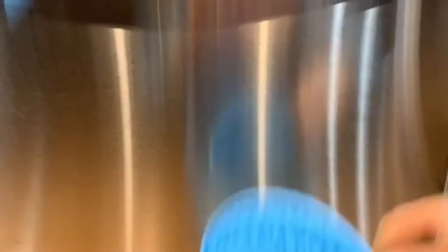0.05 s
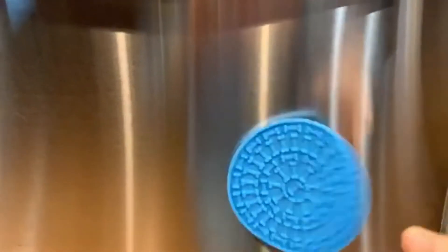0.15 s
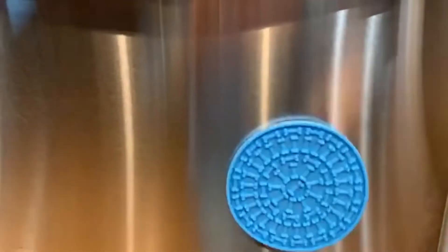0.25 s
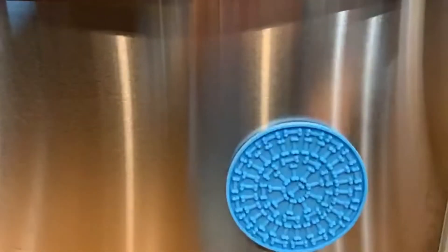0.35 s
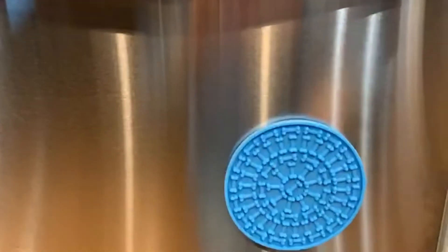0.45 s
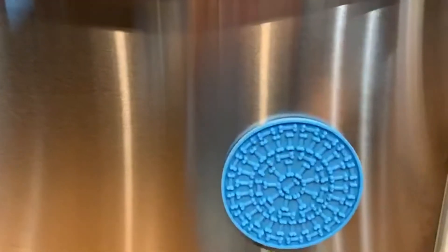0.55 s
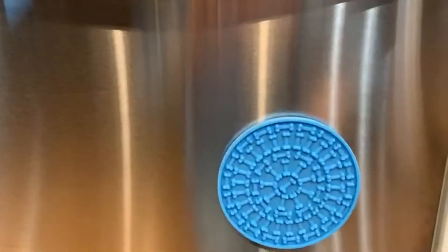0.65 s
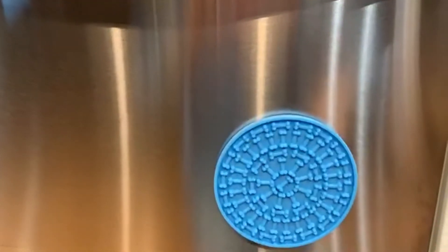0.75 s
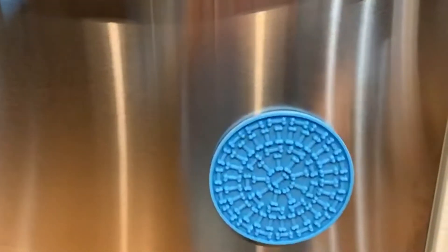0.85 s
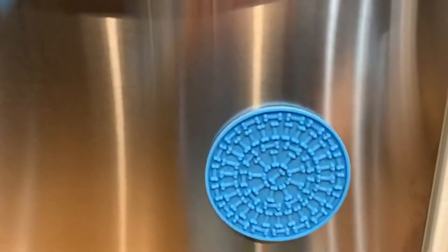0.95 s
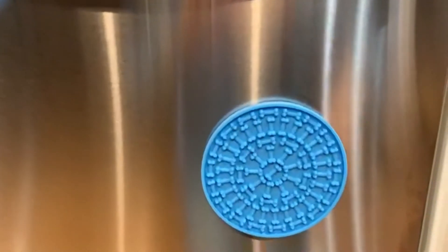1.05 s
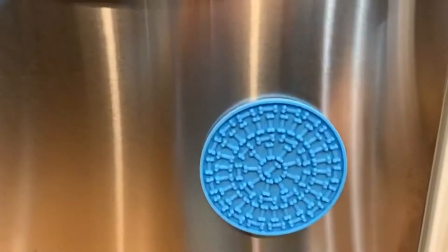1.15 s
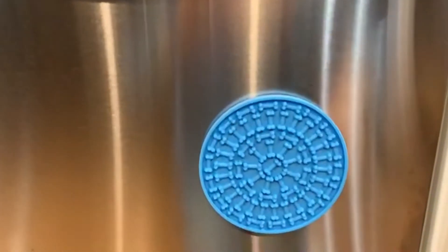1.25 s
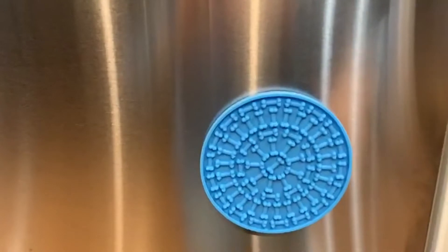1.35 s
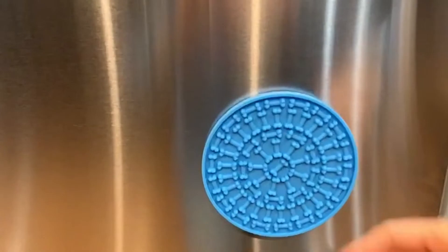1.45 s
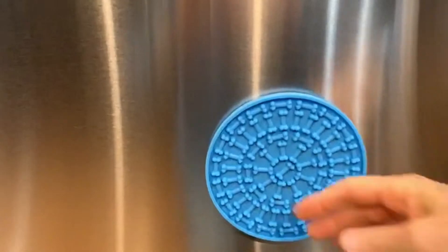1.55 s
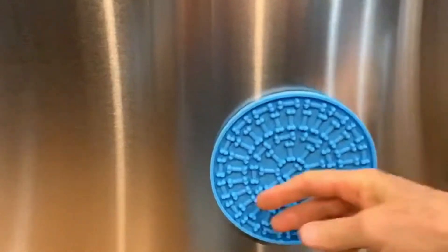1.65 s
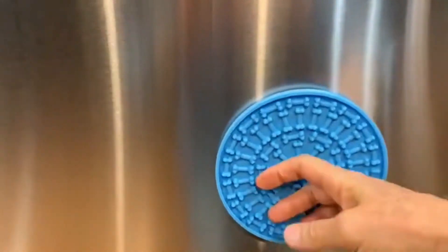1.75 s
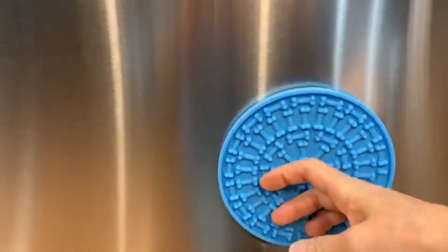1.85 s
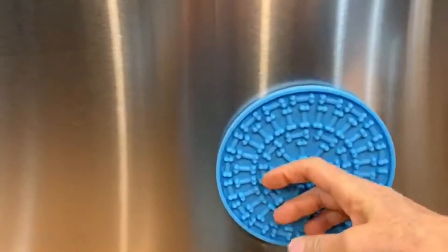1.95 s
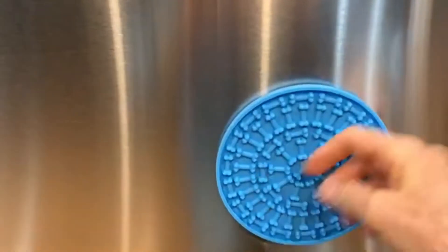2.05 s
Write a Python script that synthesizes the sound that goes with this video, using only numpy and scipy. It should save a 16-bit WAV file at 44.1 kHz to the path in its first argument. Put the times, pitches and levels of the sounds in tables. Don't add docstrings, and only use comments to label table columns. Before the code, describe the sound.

A silicone suction mat smacks a steel appliance door in a quick double slap with popping cups and a low metal thud; after a quiet gap, fingers press it with a softer cluster of pops. Close stereo phone, quiet kitchen.

```python
import sys
import numpy as np
from scipy import signal
from scipy.fft import rfft, irfft
from scipy.io import wavfile
from scipy.ndimage import uniform_filter1d

SR = 44100
rng = np.random.default_rng(int(sys.argv[2]) if len(sys.argv) > 2 else 0)


def transcribe(u):
    v = np.clip(np.atleast_2d(u).T, -1, 1)
    q = np.round(v * 32767).astype(np.int16)
    wavfile.write(sys.argv[1], SR, q)


def to_linear_factor(level_db):
    exponent = np.asarray(level_db, float) / 20
    return 10 ** exponent


N = 92610
T = np.arange(N) / SR
EARS = np.array([[.5], [-.5]])
POP_BEND = 1.346

# frequency in Hz, left over right in dB.
PORT_BALANCE = [(250, 0.5), (1500, 3.5), (3000, 2), (5000, -2.5), (8000, 0.5)]
# frequency in Hz, left ahead of right in radians.
PORT_PHASE = [(200, .1), (1000, 0.39), (2500, 0.53), (5000, 1.5), (8000, 1.3)]
SHUDDER_STARTS = [.122, .186, .2085, .277, .765, 1.80, 1.85, 1.13]
# level in dB, swell in seconds, hold in seconds,
# share of the full decay time. The first five are the bare door, the rest the door under fingers.
SHUDDER_SHAPES = [
    (-53, 0.0027, 0.0068, 0.21),
    (-38, 0.013, 0.011, 0.0432),
    (-24.5, .001, .008, 0.25),
    (-23.5, 0.0054, 0.045, 0.85),
    (-57, .006, 0.028, 0.126),
    (-26, 0.0057, 0.0325, 0.134),
    (-43, 0.011, 0.025, 2.1),
    (-61, 0.019, 0.037, .3),
]


def at(table, hz):
    table = np.array(table)
    return np.interp(np.log(np.maximum(hz, 1)), np.log(table[:, 0]), table[:, 1])


def noise(gain, size=N, near_db=0.):
    # frequency in Hz, side under mid in dB.
    diffuse_side = [(60, -16.5), (300, -8), (1500, 0.5), (8000, -1.5)]
    hz = np.arange(size // 2 + 1) * SR / size
    mid, side = rfft(rng.standard_normal((2, size)))
    ports = mid + 2 * EARS * to_linear_factor(at(diffuse_side, hz) - near_db) * side
    ports = ports * to_linear_factor(EARS * at(PORT_BALANCE, hz))
    if near_db > 0:
        ports = ports * np.exp(1j * EARS * at(PORT_PHASE, hz))
    x = irfft(gain(hz) * ports, size)
    return x / np.sqrt(np.mean(x ** 2))


def treble_gaps(hz):
    # frequency in Hz, half width in Hz, depth in dB.
    gaps = [(9800, 620, -30), (13500, 420, -30), (16200, 1100, -22)]
    return to_linear_factor(sum(db * np.exp(-((hz - f) / w) ** 4) for f, w, db in gaps))


def peaks(table):
    def gain(hz):
        return np.sqrt(sum(to_linear_factor(2 * db) / (1 + (2 * (hz - f) / w) ** 2) ** 2 for f, w, db in table))
    return gain


def shape(t, swell, t60, hold=0., bend=0.98):
    rise = np.sin(np.pi / 2 * np.clip(t / max(swell, 1e-4), 0, 1)) ** 2
    fading = np.maximum(t - swell - hold, 0) / max(t60, .002)
    return rise * to_linear_factor(-60 * fading ** bend)


def walk(rate):
    k = int(SR / rate)
    steps = np.repeat(rng.standard_normal(N // k + 1), k)
    x = uniform_filter1d(uniform_filter1d(steps, k), k)[:N]
    return x / x.std()


def levels_over_time(rows):
    return to_linear_factor(np.interp(T, *np.array(rows).T))


def add_ring(out, s, db, hz, t60, swell, glide=0., bend=0.99):
    i = int(s * SR)
    t = T[i:i + int((t60 + swell) * SR)] - s
    phase = 2 * np.pi * np.cumsum(hz * 2 ** (glide * t / t60)) / SR
    level = to_linear_factor(db + EARS * at(PORT_BALANCE, hz))
    wave = np.sin(phase + EARS * at(PORT_PHASE, hz))
    out[:, i:i + len(t)] += level * shape(t, swell, t60, bend=bend) * wave


def room(x):
    size, t60 = 16384, 0.21
    tail = noise(lambda hz: to_linear_factor(-1.5 * hz / 1000), size=size)
    tail = tail * shape(T[:size] - .002, 0.0013, t60)
    tail = tail / np.sqrt(np.sum(tail ** 2) / 2)
    return signal.fftconvolve(x.mean(axis=0)[None], tail, axes=1)[:, :N]


def cup_pops():
    # start in seconds, level in dB, pitch in Hz, ring t60 in seconds, glide in octaves over the ring.
    gliding_pops = [(.120, -53, 1300, .03, 0.1), (0.1307, -44, 1200, .011, -0.093),
                    (.130, -52, 8200, 0.011, 0.39), (.131, -53, 2600, .01, 0), (.135, -52, 800, 0.03, -0.14),
                    (.197, -37, 950, .02, -0.1), (.201, -38, 2000, 0.014, 0.11),
                    (0.265, -27, 1450, 0.0071, 0.27), (0.2761, -25, 5400, .006, 0.074),
                    (0.2087, -7, 1266, 0.027, -2.02), (0.2105, -5.5, 879, 0.012, -1.3),
                    (0.209, -18, 2500, 0.01, -0.35), (.2125, -22, 2700, 0.013, 0.093),
                    (.2145, -18, 1800, 0.0064, -0.86), (0.2166, -2.5, 1296, 0.0041, -0.095),
                    (.219, -20, 1700, 0.015, 0), (.225, -22, 1300, 0.011, -0.41), (0.2497, -29, 3100, .012, 0),
                    (0.251, -21, 1400, 0.014, 0), (0.2764, -18.5, 7420, .006, 0), (0.2772, 0, 1252, 0.0086, 0),
                    (0.281, -17, 1340, .012, -0.099), (0.291, -15, 1550, 0.013, 0.46),
                    (.300, -20.5, 1770, 0.013, 0), (.3605, -21, 1750, 0.02, -0.22),
                    (0.3615, -27, 4600, .008, -0.047), (.327, -21, 1300, 0.028, 0.091),
                    (0.785, -44, 1150, .01, -0.22), (1.8254, -19.5, 3800, 0.0071, 0.29),
                    (1.828, -21, 4400, .009, 0.81), (1.8255, -31, 7600, .007, 0.16)]
    # start in seconds,
    # level in dB, pitch in Hz, ring t60 in seconds, swell in seconds.
    steady_pops = [(0.2489, -22, 4170, 0.0085, 0.0034), (.359, -16.5, 2620, 0.013, 0.0017),
                   (2.078, -46, 4240, .008, .001), (1.812, -32, 4900, 0.0069, .002),
                   (1.8027, -26, 8500, .005, .001), (1.8065, -31, 8800, 0.0045, .001),
                   (1.804, -24, 5230, .005, .001), (1.8188, -28, 4400, 0.0065, 0.0016),
                   (1.836, -33.5, 8000, 0.0055, .001), (1.8155, -27, 2750, .007, .001),
                   (1.827, -17.5, 1800, 0.0068, .002), (1.841, -16.5, 1660, 0.014, .002),
                   (1.856, -32.5, 1570, 0.01, 0.00085), (1.7873, -27.5, 1695, 0.017, 0.00061),
                   (1.7872, -30, 2610, 0.014, 0.00026), (1.7988, -16.5, 1671, 0.024, 0.0018),
                   (1.799, -17.5, 2546, 0.02, 0.0018), (1.8043, -5, 1690, 0.012, 0.0012),
                   (1.8046, -13.5, 2610, 0.012, .0005), (1.7969, -25.5, 7580, 0.0046, 0.0007),
                   (1.8142, -17.5, 1495, 0.008, 0.0022), (1.819, -21, 2660, 0.01, .002),
                   (1.821, -19, 1640, 0.017, 0.0051), (1.8285, -12, 2550, 0.012, 0.0023),
                   (1.834, -11.5, 1643, 0.013, 0.006), (1.8352, -24.5, 4830, 0.007, 0.0009),
                   (1.836, -20.5, 3300, 0.013, .003), (1.8415, -22, 3646, 0.013, 0.002),
                   (1.848, -32, 1694, 0.0086, 0.003), (1.998, -39.5, 1660, 0.043, 0.0011),
                   (2.079, -39, 1660, 0.038, 0.00041), (2.079, -41, 2620, 0.029, 0.0013)]
    pops = np.zeros((2, N))
    for s, db, hz, t60, glide in gliding_pops:
        add_ring(pops, s, db, hz, t60, .0007, glide, POP_BEND)
    for s, db, hz, t60, swell in steady_pops:
        add_ring(pops, s, db, hz, t60, swell, bend=POP_BEND)
    return pops + to_linear_factor(-16.5) * room(pops)


def door_thuds():
    # start in seconds, level in dB, pitch in Hz,
    # ring t60 in seconds, swell in seconds.
    pushes = [(0.2099, -9, 432, 0.068, 0.0014), (0.211, -9, 283, 0.072, 0.0011),
              (0.21, -13, 178, 0.1, 0.003), (.24, -20, 170, .08, .006), (.215, -18.5, 100, 0.11, 0.0085),
              (0.216, -26.5, 60.5, 0.17, .008), (.252, -19, 260, 0.026, 0.0018),
              (0.277, -17, 203, 0.25, 0.0017), (.280, -19, 300, 0.097, 0.0034),
              (0.279, -19.5, 244.4, 0.13, 0.005), (0.295, -26, 118.2, 0.2, .03),
              (.36, -26, 250, .15, 0.011), (.365, -33, 75, 0.11, 0.01), (.42, -37.5, 78, .15, .01),
              (.475, -37, 261, 0.14, .012), (.77, -49.5, 97, .12, .01), (1.584, -36.5, 171, 0.018, 0.0011),
              (1.795, -26, 238, 0.063, 0.0027), (1.802, -17, 164.6, 0.17, 0.0029),
              (1.811, -17, 302, 0.08, 0.004), (1.82, -13.5, 321, 0.061, 0.0021),
              (1.829, -28, 106, 0.1, 0.0065), (1.875, -29.5, 183, 0.1, 0.0032),
              (1.89, -41, 363, 0.15, 0.0056), (1.998, -41, 310, 0.12, 0.003),
              (2.083, -33, 207.4, 0.077, 0.0039), (2.084, -35.5, 110, 0.39, 0.0054)]
    thuds = np.zeros((2, N))
    for s, db, hz, t60, swell in pushes:
        add_ring(thuds, s, db, hz, t60, swell)
    return thuds * to_linear_factor(1.9 * walk(45))


def rubber_cracks():
    # start in seconds, level in dB, length t60 in seconds.
    contacts = [(0.2086, -20.5, 0.019), (0.2154, -25, 0.013), (0.2483, -20, 0.016), (0.2761, -14.5, 0.011),
                (0.3595, -23, .017), (2.07, -46.5, 0.016), (.531, -49, .006), (.761, -55.5, 0.0072),
                (.786, -57, .012), (1.81, -31, .04), (1.7965, -30, 0.02), (1.803, -23.5, 0.0153),
                (1.823, -32, .03), (1.836, -33, 0.028), (1.998, -45.5, 0.023), (2.077, -44, .02)]
    # frequency in Hz, density in dB per Hz.
    colour = [(1500, 5), (3500, -8), (7500, -11.5), (11000, -16.5), (16000, -32)]
    slap_end_s, soft_top_hz = .3, 9500
    hiss = noise(lambda hz: to_linear_factor(at(colour, hz)) * hz ** 2 / (hz ** 2 + 1200 ** 2), near_db=9.5)
    dull = signal.sosfilt(signal.butter(3, soft_top_hz, fs=SR, output="sos"), hiss)
    bursts = np.zeros((2, N))
    for s, db, t60 in contacts:
        source = hiss if s < slap_end_s else dull
        bursts += source * to_linear_factor(db) * shape(T - s, .0006, t60, bend=POP_BEND)
    return bursts + to_linear_factor(-8) * room(bursts)


def door_shudder():
    # frequency in Hz, density in dB per Hz.
    colour = [(24, -46), (40, -22), (209, 1.5), (503, -9), (2050, -11.5), (2630, -14), (3380, -25),
              (7360, -27.5), (16000, -47.5)]
    # frequency in Hz, width in Hz, a level in dB that is set aside.
    modes = [(285, 50, -1), (856, 31, -3), (1250, 300, 0), (2550, 100, -7)]
    # frequency in Hz, t60 in seconds.
    decay = [(60, 0.61), (250, 0.34), (1200, 0.76), (3000, .5), (8000, 0.34), (15000, 0.21)]
    mode_gain = peaks([(f, w, 0) for f, w, _ in modes])
    out = 0
    for hz in 45 * 2 ** np.arange(0, 8.6, .5):
        def gain(f):
            band = np.exp(-(np.log2(np.maximum(f, 1) / hz) / .3) ** 2)
            return band * treble_gaps(f) ** .3 * (1 + to_linear_factor(11) * mode_gain(f))
        db = at(colour, hz) + 10 * np.log10(hz / 1000)
        fade = 0
        for s, (level, swell, hold, share) in zip(SHUDDER_STARTS[:5], SHUDDER_SHAPES[:5]):
            fade = fade + to_linear_factor(level) * shape(T - s, swell, share * at(decay, hz), hold, 1.348)
        out = out + to_linear_factor(db) * noise(gain) * fade
    return out


def pressed_shudder():
    # frequency in Hz, width in Hz, level in dB.
    resonances = [(1660, 300, 0.5), (2560, 300, -2), (3455, 350, -4), (4900, 1600, -13), (300, 178, 9.5)]
    fade = 0
    for s, (level, swell, hold, share) in zip(SHUDDER_STARTS[5:], SHUDDER_SHAPES[5:]):
        fade = fade + to_linear_factor(level) * shape(T - s, swell, share * .5, hold)
    return noise(peaks(resonances)) * fade * to_linear_factor(2.4 * walk(60))


def hand_rub():
    # time in seconds, level in dB.
    strokes = [(0, -66), (.15, -62), (.3, -87), (.88, -82.5), (.9, -66), (.96, -81), (1.13, -85),
               (1.18, -70), (1.24, -81), (1.4, -75.5), (1.53, -60.5), (1.68, -56.5), (1.78, -56.5),
               (2.1, -66.5)]
    # frequency in Hz, width in Hz, level in dB.
    resonances = [(3300, 1200, 0.5), (5500, 4700, -9.5), (1595, 500, -5)]
    hiss = noise(lambda hz: peaks(resonances)(hz) * treble_gaps(hz))
    return hiss * levels_over_time(strokes) * to_linear_factor(1.2 * walk(25))


def appliance_hum():
    # time in seconds, level in dB.
    swells = [(0, -69), (.7, -66.5), (1.0, -67), (1.04, -45), (1.13, -46.5), (1.155, -54), (1.18, -46),
              (1.235, -56), (1.275, -46.5), (1.33, -49), (1.365, -58), (1.395, -44), (1.45, -51.5),
              (1.59, -43.5), (1.67, -47.5), (1.75, -53.5), (1.92, -46.5), (2.1, -50.5)]
    pitch_hz, wander_hz = 115.9, 5
    throb_hz, throb_depth = 12, 0.17
    hum = np.sin(2 * np.pi * np.cumsum(pitch_hz + wander_hz * walk(50)) / SR)
    hum = hum * levels_over_time(swells) * to_linear_factor(0.57 * walk(35.0))
    return hum * (1 + throb_depth * np.cos(2 * np.pi * throb_hz * (T - 1.05)))


def kitchen_air():
    # frequency in Hz, density in dB per Hz.
    colour = [(30, -12), (112, -0.5), (1350, -24), (6000, -36), (8500, -32.5), (11800, -32.5), (15500, -37)]
    air = noise(lambda hz: to_linear_factor(at(colour, hz)) * treble_gaps(hz))
    return air * to_linear_factor(-56 + 0.4 * walk(9.6))


def scene():
    contacts = cup_pops() + door_thuds() + rubber_cracks()
    door = door_shudder() + pressed_shudder()
    return contacts + door + hand_rub() + appliance_hum() + kitchen_air()


def band_limit(x):
    return signal.sosfilt(signal.butter(12, 16530, fs=SR, output="sos"), x)


def record(dry):
    rounded = np.tanh(0.82 * dry) / 0.77
    cut = signal.sosfilt(signal.butter(12, 16000, fs=SR, output="sos"), rounded)
    mix = signal.sosfilt(signal.butter(2, 36, "high", fs=SR, output="sos"), cut)
    return band_limit(mix)


dry = scene()
out = record(dry)
transcribe(out)
```